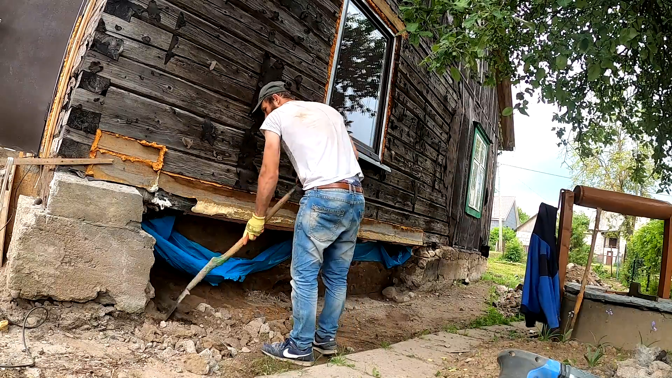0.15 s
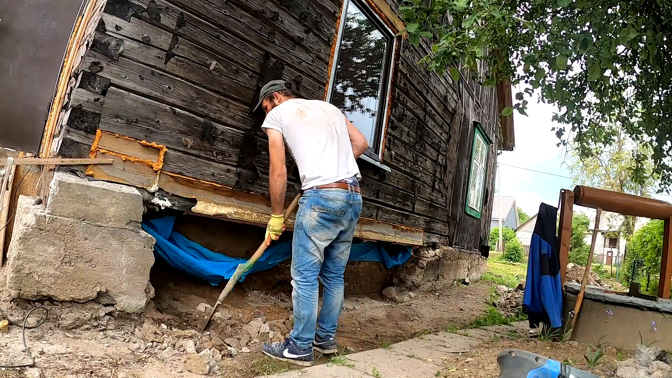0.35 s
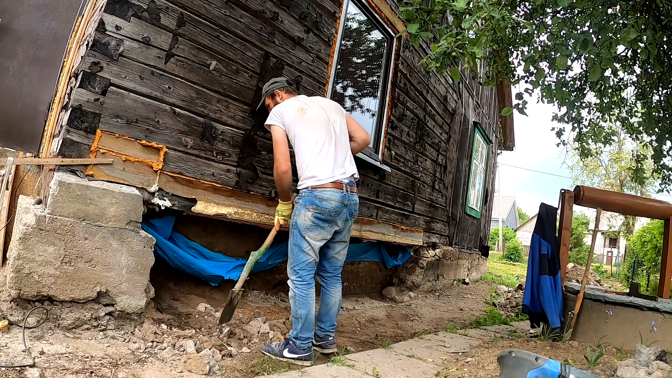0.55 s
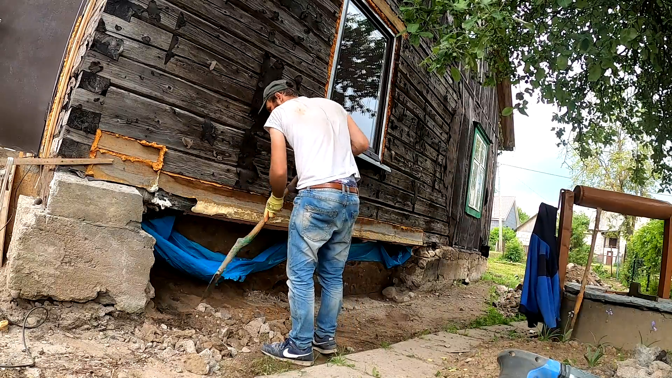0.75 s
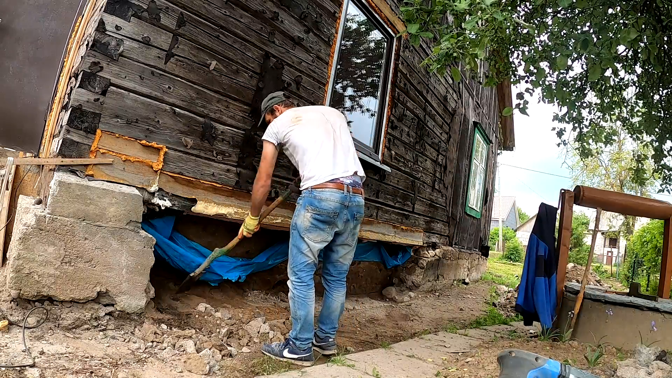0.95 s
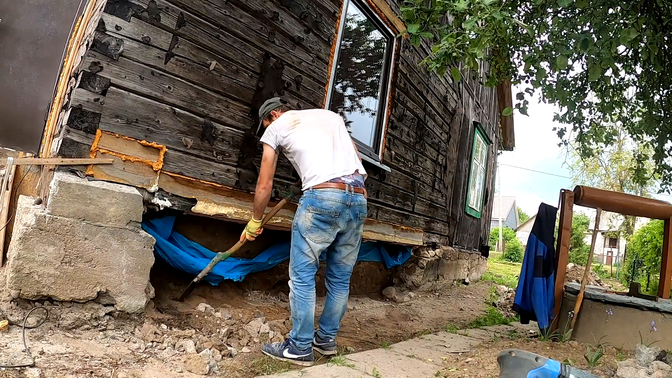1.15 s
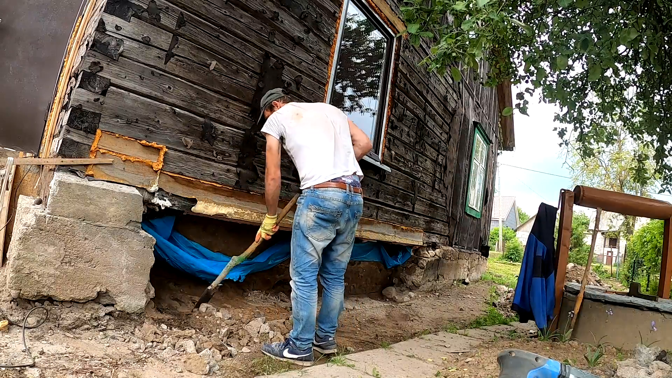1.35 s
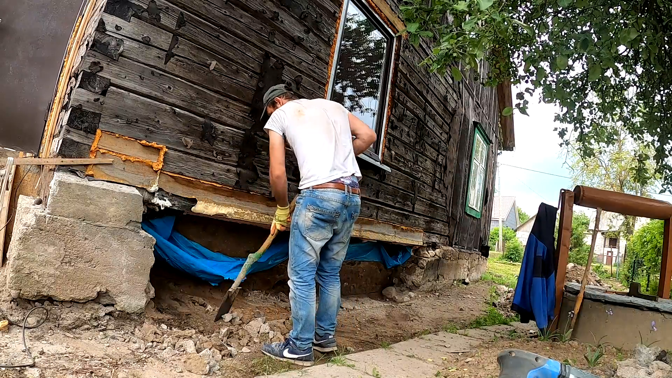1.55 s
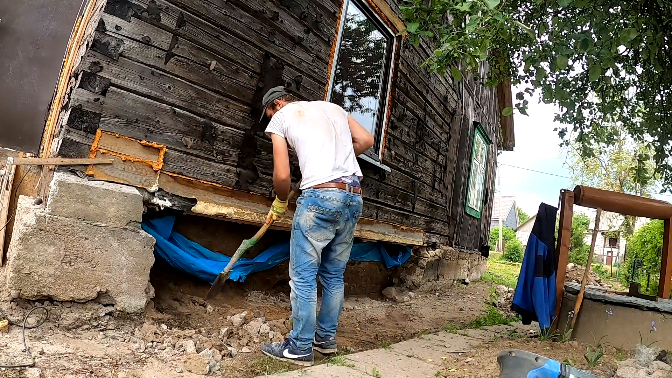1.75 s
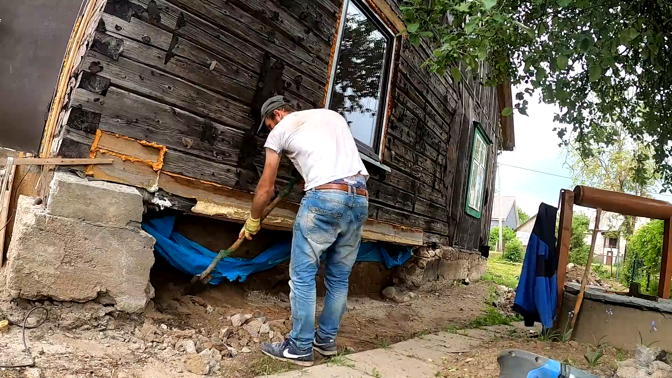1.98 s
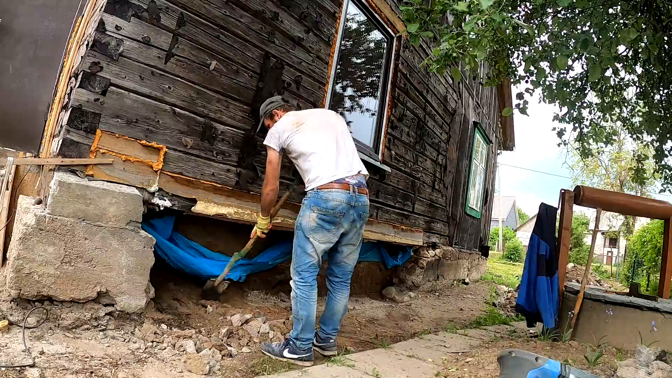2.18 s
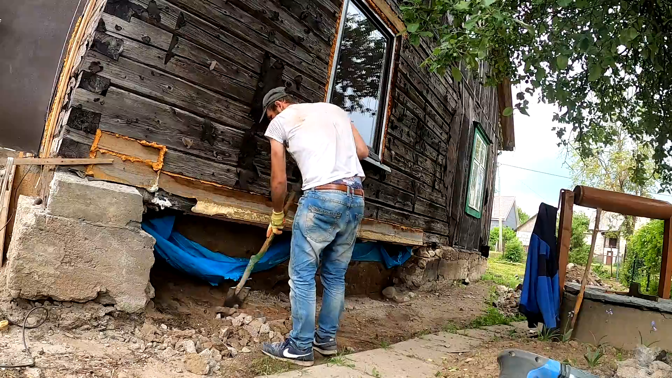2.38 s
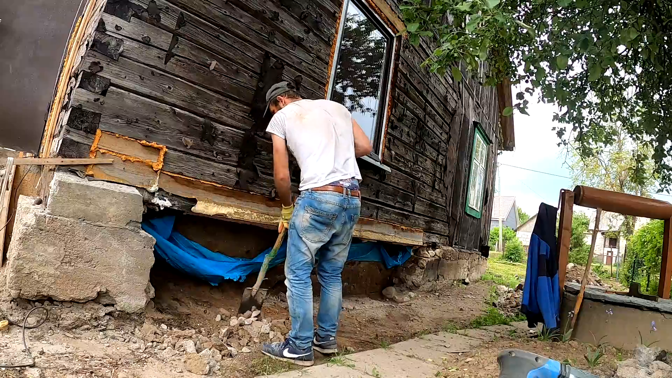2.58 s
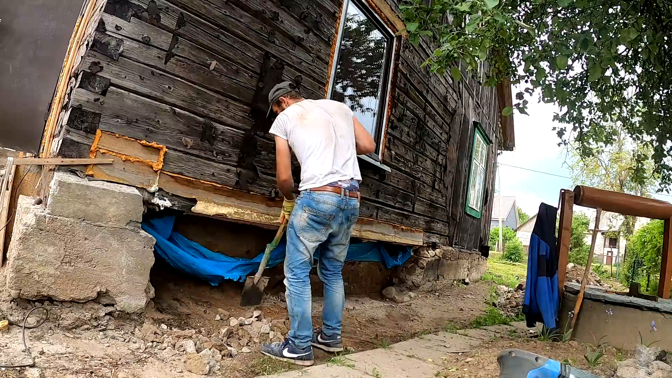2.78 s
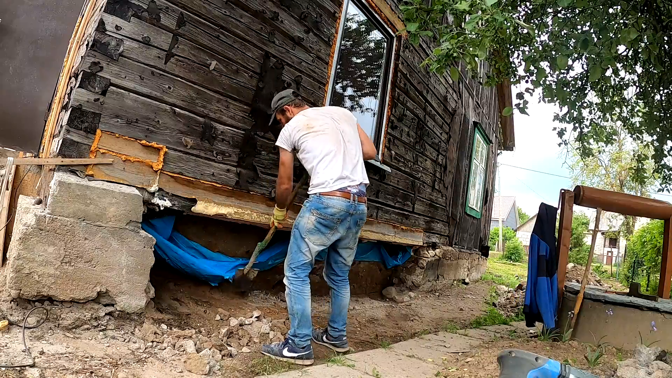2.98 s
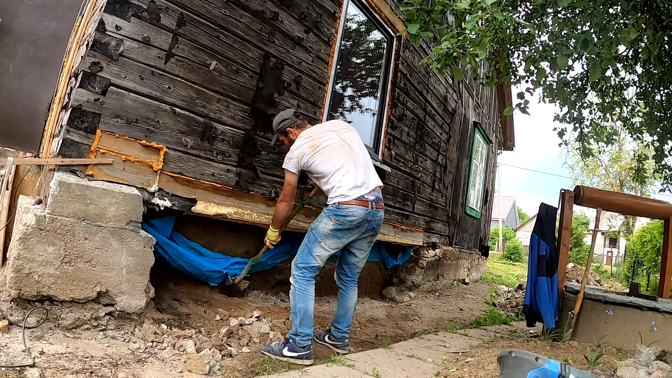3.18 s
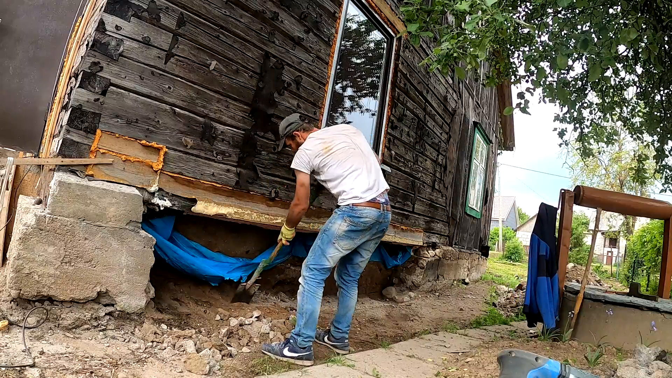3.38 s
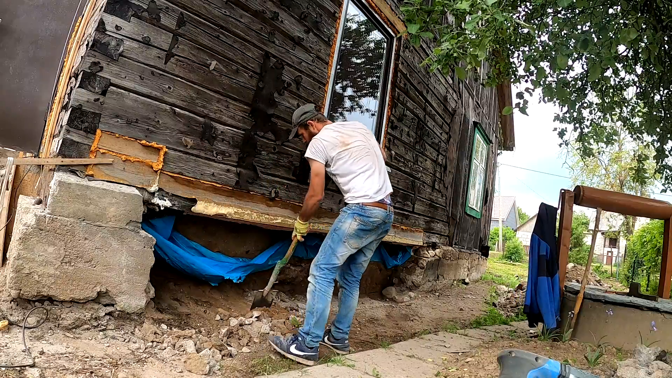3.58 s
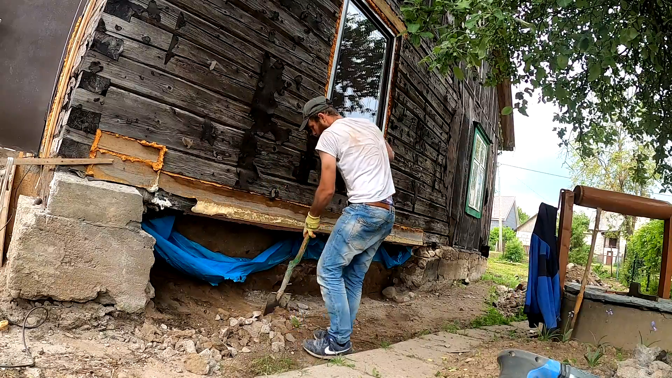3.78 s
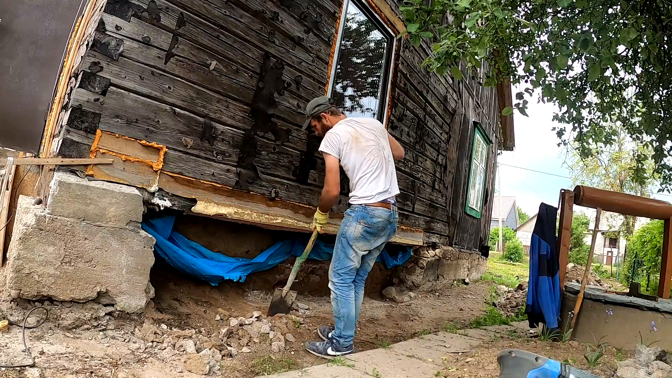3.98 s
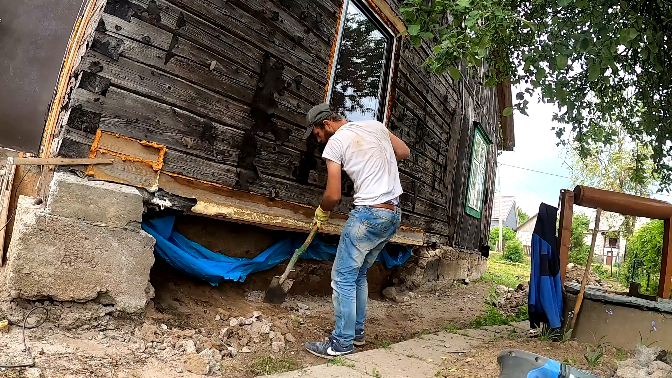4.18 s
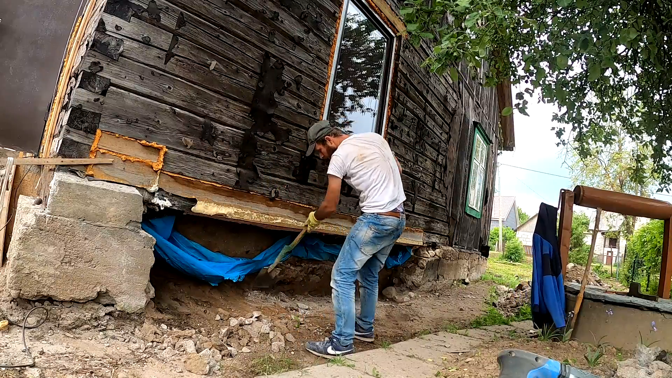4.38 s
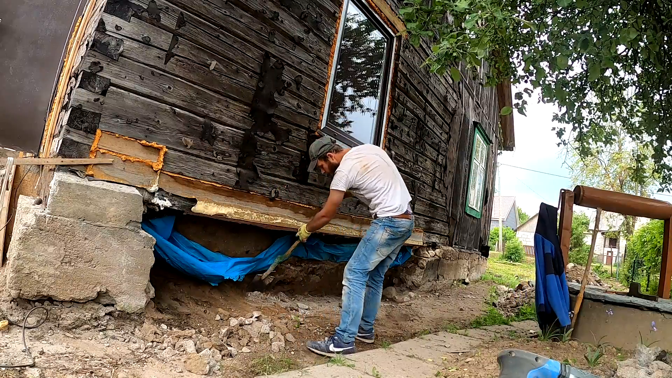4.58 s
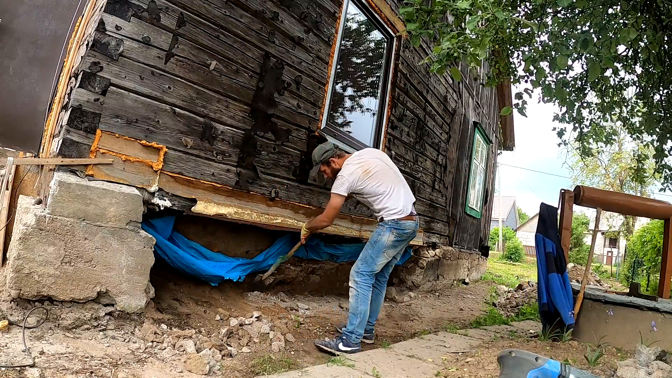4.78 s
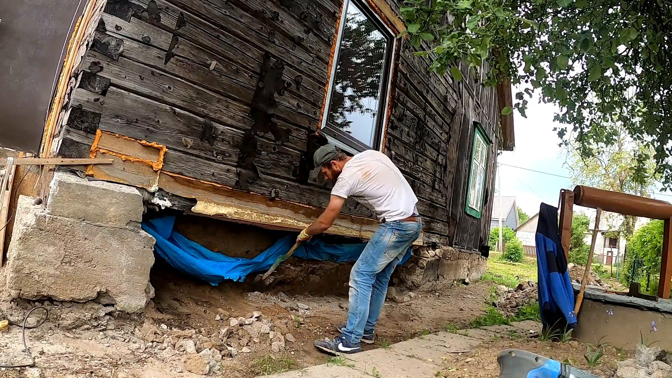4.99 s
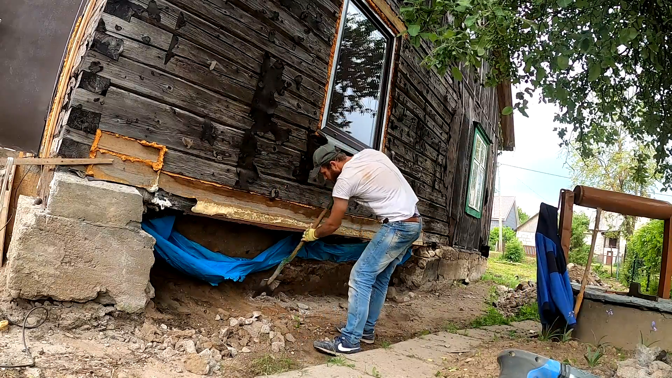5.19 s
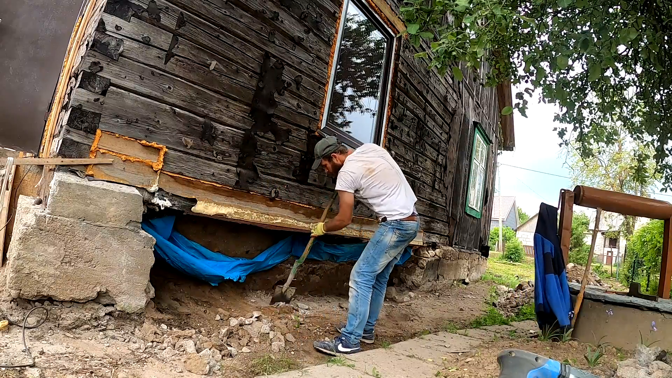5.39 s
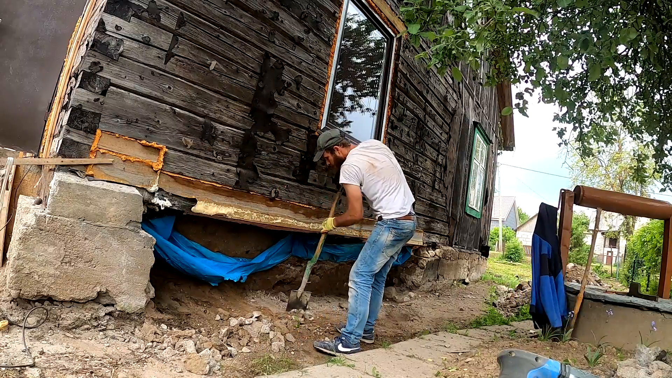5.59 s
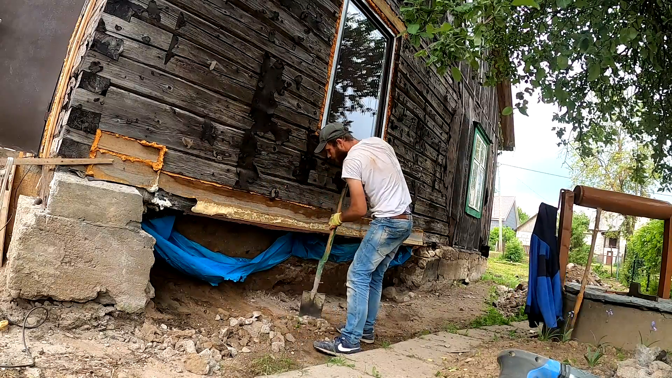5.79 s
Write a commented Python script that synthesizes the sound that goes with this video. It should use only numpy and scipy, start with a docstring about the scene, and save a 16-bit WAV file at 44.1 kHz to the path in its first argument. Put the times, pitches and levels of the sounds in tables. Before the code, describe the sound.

A steel shovel is pushed and dragged through stony soil and broken brick in about six strokes, roughly one a second. Each swells into a gritty crunch, with pebbles clicking on the blade and a dull thud from the ground. Gusts of wind rumble on the microphone, mostly in the first half. The shovel is fairly close, in a yard beside a house wall, over a faint outdoor hiss.

```python
"""A steel shovel is pushed and dragged through stony soil and broken brick beside a timber house.
Stones crunch and slide in bursts of grains that ring briefly themselves and shake the blade;
the soil thuds below, and the house wall returns a short blur.
Gusts buffet the two microphone ports, and a faint garden hiss lies under everything."""
import sys
import numpy as np
from scipy import signal
from scipy.fft import rfft, irfft, next_fast_len
from scipy.io import wavfile

SR = 44100
rng = np.random.default_rng(int(sys.argv[2]) if len(sys.argv) > 2 else 0)


def wav_out(sig):
    """Save sig, one row per channel (or a flat mono array), as 16-bit PCM at SR to the path in sys.argv[1]."""
    wavfile.write(sys.argv[1], SR, np.round(np.clip(np.atleast_2d(sig).T, -1, 1) * 32767).astype(np.int16))


N = 257984

# Resonances of blade and shaft. Each row: pitch in Hz, width in Hz, relative level in dB.
BLADE_MODES = [(275, 40, 3), (380, 50, -6), (710, 70, -8), (979, 48, -8), (1518, 70, -5), (1684, 50, -1),
               (2079, 50, -3), (2297, 50, -5), (2450, 60, -5), (2640, 60, -2), (3425, 70, -4),
               (4960, 120, -8), (6190, 90, 1), (7790, 90, -5)]
THUD_RISE_S = 0.0047


def amp(db):
    """Decibels to gain."""
    return 10 ** (np.asarray(db) / 20)


def rms_one(x):
    """Scale to rms 1."""
    return x / np.sqrt(np.mean(x ** 2) + 1e-20)


def in_time(rows):
    """Draw each column of a timed curve as an envelope, one value per sample."""
    times, *columns = np.transpose(rows)
    return [np.interp(np.arange(N) / SR, times, column) for column in columns]


def at_hz(points, hz):
    """Read a spectrum on a log-frequency axis."""
    pitches, values = np.transpose(points)
    return np.interp(np.log(hz), np.log(np.maximum(pitches, 1)), values)


def drift(rate_hz):
    """Slow random modulation of rms 1: coarse noise twice through a one-pole low-pass."""
    r = np.exp(-32 * np.pi * rate_hz / SR)
    slow = signal.lfilter([1], [1, -2 * r, r * r], rng.standard_normal(N // 16 + 2002))[2000:]
    return np.interp(np.arange(N) / 16, np.arange(len(slow)), rms_one(slow))


def resonate(x, hz, width_hz):
    """Two-pole resonance with gain 1 at its peak."""
    r = np.exp(-np.pi * width_hz / SR)
    feedback = [1, -2 * r * np.cos(2 * np.pi * hz / SR), r * r]
    return signal.lfilter([(1 - r * r) / 2, 0, (r * r - 1) / 2], feedback, x)


def band(x, low_hz, high_hz):
    """Butterworth band-pass."""
    return signal.sosfilt(signal.butter(2, [low_hz, high_hz], "band", fs=SR, output="sos"), x)


def spread(mid, side, likeness, colour):
    """Left and right share the mid signal and differ by the side signal, frequency by frequency."""
    size = next_fast_len(N)
    hz = np.maximum(np.arange(size // 2 + 1) * SR / size, 1)
    alike = np.clip(at_hz(likeness, hz), 0, 1)
    both = np.sqrt(1 + alike) * rfft(mid, size) + np.sqrt(1 - alike) * rfft(side, size) * [[1], [-1]]
    return irfft(both * amp(at_hz(colour, hz)) / np.sqrt(2), size)[:, :N]


def garden(level_db=-60.5):
    """Distant leaves and traffic: a smooth bed of hiss that swells slightly."""
    # Tone of the hiss. Each row: frequency in Hz, relative level in dB.
    colour = [(59, -36), (100, 16), (194, 0.5), (312, -11), (346, 10.5), (368, 3), (523, -17), (630, -36),
              (1010, 5.5), (3810, -9.5), (6250, -5.5), (9650, -42), (14000, -58)]
    # Its stereo image. Each row: frequency in Hz, left-right likeness from 0 to 1.
    likeness = [(60, 1), (180, 1), (550, 0.81), (1650, 0.67), (4970, 0.089), (15000, 0.24)]
    hiss = spread(*rng.standard_normal((2, N)), likeness, colour)
    return amp(level_db + 0.33 * drift(0.87)) * rms_one(hiss)


def wind(lumps_db=0.5, wander_db=5, flutter_db=-9.5, flutter_growth=.2):
    """Each port catches its own lumpy rumble, with a brighter flutter on top in strong gusts."""
    # The breeze between gusts. Each row: time in seconds, level in dB.
    breeze = [(0.0, -40), (0.55, -34), (0.67, -43), (1.37, -43.5), (1.71, -48), (1.87, -54), (2.07, -43),
              (3.11, -59), (3.4, -55.5), (4.02, -58.5), (4.77, -55.5), (5.1, -59), (5.3, -49), (5.85, -52)]
    # Buffets. Each row: start in seconds, level in dB, left over right in dB, rise in seconds.
    gusts = [(0.06, -43, -2, 0.026), (0.181, -36.5, 12, 0.018), (0.275, -28, 5, 0.038),
             (0.34, -29, -8, 0.056), (0.421, -29, -8, 0.049), (0.673, -34.5, 5, 0.032),
             (0.766, -42, 9, 0.024), (0.878, -27, 2, 0.029), (0.943, -38, 15, 0.037),
             (1.17, -38, 4.0, 0.04), (1.278, -35.5, 11, 0.019), (1.353, -25, -4, 0.029),
             (1.582, -47, -2.5, 0.035), (1.883, -33.5, 2, 0.033), (1.964, -33.5, -3, 0.036),
             (2.079, -39, 8.5, 0.034), (2.193, -32, 5, 0.024), (2.343, -32, 0.5, 0.018),
             (2.466, -31, -10, 0.023), (2.859, -43.5, -3.5, 0.11), (3.155, -48, 0, 0.04),
             (3.293, -44, 2.5, 0.024), (3.437, -43, 4, 0.055), (4.541, -41.5, 7, 0.03),
             (4.671, -42, 2, 0.063), (5.08, -39, 4, 0.032), (5.187, -45.5, 16, 0.033),
             (5.376, -39, 7.5, 0.053), (5.573, -44, 13, 0.024), (5.788, -35.5, 7, 0.04)]
    out, t = np.zeros((2, N)), np.arange(N) / SR
    level_db, = in_time(breeze)
    sway_db = wander_db * drift(4)
    for port, side in enumerate([.5, -.5]):
        rumble = rms_one(band(rng.standard_normal(N), 24.3, 60.8))
        flutter = rms_one(band(rng.standard_normal(N), 106, 182))
        lumps = amp(lumps_db * drift(16.5))
        strength = amp(level_db + side * sway_db) * rms_one(lumps)
        for s, gust_db, pan_db, rise in gusts:
            at = slice(max(int((s - .2) * SR), 0), int((s + .4) * SR))
            strength[at] += amp(gust_db + side * pan_db) * np.exp(-((t[at] - s) / rise - 1) ** 2)
        out[port] = strength * (rumble + amp(flutter_db) * strength ** flutter_growth * flutter)
    # one sharp puff hits the left port alone
    puff_s, puff_db, puff_hz, width_s = .9115, -13, 105, .008
    puff = np.exp(-((t - puff_s) / width_s) ** 2) * np.cos(2 * np.pi * puff_hz * (t - puff_s))
    out[0] += amp(puff_db) * puff
    return out


def yard(mid_side, t60=0.2, wet_db=-12, dull_hz=12000):
    """The wall and the hollow under the floor return a short blur; the camera body dulls the treble."""
    # The path from the pit, notched by the ground echo. Each row: frequency in Hz, gain in dB.
    path = [(100, 1.5), (270, 1.5), (480, -1.5), (740, -1), (860, -5.5), (970, -4.5), (1120, -4),
            (1200, -6), (1350, -6), (1550, -5.5), (6500, -2), (7000, -5), (7600, -2), (10000, -6.5),
            (13000, 0)]
    # Stereo image of the shovel. Each row: frequency in Hz, left-right likeness from 0 to 1.
    likeness = [(100, .995), (500, .985), (1000, .96), (2000, .93), (4000, .8), (8000, .74), (14000, .6)]
    t = np.arange(int(.15 * SR)) / SR
    blur = rng.standard_normal((2, len(t))) * amp(-60 * t / t60)
    echoes = signal.fftconvolve(mid_side, blur / np.linalg.norm(blur[0]), axes=1)[:, :N]
    lowpass = signal.butter(2, dull_hz, fs=SR, output="sos")
    dulled = signal.sosfilt(lowpass, mid_side + amp(wet_db) * echoes)
    return spread(*dulled, likeness, path)


def thumps():
    """The blade meets solid ground: a low tone roughened by the soil, dying fast."""
    # Each row: start in seconds, level in dB, pitch in Hz, 60 dB decay time in seconds.
    hits = [(0.319, -17, 268, 0.081), (0.44, -27.5, 163, 0.116), (0.499, -33, 196, 0.1),
            (1.157, -20, 281, 0.11), (1.337, -22.5, 260, 0.1), (1.451, -18.5, 258.4, 0.16),
            (1.489, -22.5, 277, 0.086), (2.27, -18.5, 315, 0.09), (2.359, -26.5, 349, 0.18),
            (2.454, -17, 147, 0.072), (3.561, -20, 286, 0.1), (4.67, -21.5, 124, 0.086),
            (5.36, -23.5, 317, 0.11), (5.572, -21, 314, 0.081)]
    out, t = np.zeros(N + SR), np.arange(SR // 4) / SR
    attack = np.minimum(t / THUD_RISE_S, 1)
    for s, level_db, hz, t60 in hits:
        soil = rms_one(band(rng.standard_normal(len(t)), 83, 330))
        body = np.sin(2 * np.pi * hz * t) + 0.66 * soil
        start = int(s * SR)
        out[start:start + len(t)] += amp(level_db - 60 * t / t60) * attack * body
    return out[:N]


def pebbles(cycles=5, boost_db=4):
    """Single pebbles tick once on the steel: a short ring with a bright snap."""
    # Each row: start in seconds, relative peak in dB, pitch in Hz.
    ticks = [(0.3374, -9, 1550), (0.5691, -19, 2600), (0.6978, -20, 2900), (1.0944, -28, 2290),
             (1.4544, -5, 1680), (1.4894, -8, 1690), (1.5294, -16, 1780), (2.4049, -7, 2760),
             (2.4244, -7, 2000), (2.5775, -18, 1540), (2.6424, -14, 2110), (3.3278, -8, 3320),
             (3.4321, -9, 2530), (3.4496, -7, 2080), (3.5498, -7, 2630), (3.6406, -8, 3450),
             (3.7708, -13, 1620), (4.8244, -21, 4870), (4.9018, -26, 2200), (5.0844, -37, 3600),
             (5.2639, -8, 2840), (5.3383, -10, 1760), (5.3632, -3, 1780), (5.5762, -7, 2450),
             (5.7214, -13, 2800)]
    out, click = np.zeros(N), signal.unit_impulse(SR // 50)
    for s, peak_db, hz in ticks:
        tick = resonate(click, hz, hz / cycles) + 0.08 * band(click, hz, 5900)
        start = int(s * SR)
        out[start:start + len(tick)] += amp(peak_db + boost_db) * tick / tick.max()
    return out


def swell(s, t60, fade_curve=1.215):
    """Span and envelope of a crunch: a rounded attack centred on s, then an ever faster fade."""
    rise_s = 0.0036 + 0.055 * t60   # longer crunches swell more slowly
    start = int((s - rise_s / 2) * SR)
    t = np.arange(min(SR // 6, N - start)) / SR
    attack = np.sin(np.pi / 2 * np.minimum(t / rise_s, 1)) ** 2
    fade = amp(-60 * (np.maximum(t - rise_s, 0) / t60) ** fade_curve)
    return slice(start, start + len(t)), attack * fade


def grains(per_s, spread_db):
    """Clumps of uneven clicks; mid and side take their own signs, as each grain lies elsewhere."""
    sizes = amp(spread_db * np.minimum(rng.exponential(1, N), 3))
    signs = rng.choice([-1, 1], (2, N))
    struck = rng.random(N) < per_s * amp(4.0 * drift(60)) / SR
    return rms_one(sizes * signs * struck + 1e-18)


def contact(crunches):
    """Envelopes of the contact in the thud, grit and treble ranges: the slide plus a swell per crunch."""
    # Pressure of the sliding blade, one curve per stroke.
    # Each row: time in seconds, grit level in dB, soil drag level in dB.
    strokes = [
        [(0.0, -55.5, -56), (0.174, -50, -55), (0.308, -27.5, -44.5), (0.428, -36.5, -54), (0.526, -41.5, -49),
         (0.65, -50, -60), (0.81, -53.5, -69), (1.0, -54.5, -69)],
        [(1.02, -58, -63), (1.13, -51, -63), (1.298, -39, -54), (1.386, -27.5, -45), (1.45, -20, -41),
         (1.602, -38, -50), (1.726, -48.5, -69), (1.95, -66.5, -68)],
        [(1.97, -76, -80.5), (2.14, -49, -54), (2.314, -25.5, -37.5), (2.372, -29.5, -41), (2.652, -44, -49.5),
         (2.724, -39.5, -59), (2.832, -52, -70), (3.05, -61, -74)],
        [(3.07, -63.5, -59.5), (3.208, -45.5, -56.5), (3.488, -30, -39), (3.718, -43, -53),
         (3.876, -50.5, -57.5), (4.004, -41.5, -55.5), (4.168, -55, -72), (4.45, -80.5, -72)],
        [(4.47, -65, -73.5), (4.7, -56, -60), (4.76, -48, -53), (4.836, -60, -61), (4.888, -49, -54),
         (5.002, -63, -64), (5.068, -52, -71), (5.17, -66.5, -72)],
        [(5.19, -69, -71), (5.278, -50, -60.5), (5.316, -28.5, -48), (5.398, -30, -42), (5.428, -44, -41),
         (5.468, -34.5, -47), (5.722, -39.5, -50), (5.85, -45, -53)],
    ]
    grit_db, drag_db = in_time(np.concatenate(strokes))
    brightness_db = 3.5 + 0.34 * grit_db   # harder pressure is brighter
    out = amp([drag_db, grit_db, grit_db + brightness_db])
    for s, peak_db, thud_db, treble_db, *_, t60 in crunches:
        at, envelope = swell(s, t60)
        rms_db = peak_db - 9.5
        out[:, at] += amp(rms_db + np.array([[thud_db], [0], [treble_db]])) * envelope
    return out


def stones(crunches, cycles=20, clack_db=(-9.5, -12.5), knock_db=-6, knock_t60=0.078):
    """The larger stones of each crunch clack at a low and a high pitch and knock the shaft."""
    out, rubbing = np.zeros((2, N)), grains(1200, spread_db=4.0)
    knock_pitches = BLADE_MODES[0][0] * rng.uniform(0.885, 1.24, len(crunches))
    for (s, peak_db, thud_db, _, *pitches, t60), knock_hz in zip(crunches, knock_pitches):
        at, envelope = swell(s, t60)
        for hz, level_db in zip(pitches, clack_db):
            makeup = np.sqrt(SR * cycles / hz / np.pi)
            clack = makeup * resonate(rubbing[:, at] * envelope, hz, hz / cycles)
            out[:, at] += amp(peak_db + level_db) * resonate(clack, hz, hz / 3)
        t = np.arange(len(envelope)) / SR
        knock_shape = np.minimum(t / THUD_RISE_S, 1) * amp(-60 * t / knock_t60)
        out[:, at] += amp(peak_db + thud_db + knock_db) * knock_shape * np.sin(2 * np.pi * knock_hz * t)
    return out


def blade(strengths, gain_db=-10.5):
    """Grains drive the modes of the held blade, which favours other ones from moment to moment."""
    # The freed blade rings on.
    # Each row: start in seconds, pitch in Hz, level in dB, 60 dB decay time in seconds.
    rings = [(1.76, 1418, -54, .6), (4.99, 3600, -46, .2)]
    out, rubbing = np.zeros((2, N)), grains(5000, spread_db=2.0)
    for hz, width_hz, level_db in BLADE_MODES:
        strength = strengths[np.searchsorted([800, 5500], hz)]   # thud, grit or treble range
        push = rubbing * strength * amp(4.5 * drift(12))
        makeup = np.sqrt(SR / width_hz / np.pi)
        out += amp(level_db + gain_db) * makeup * resonate(push, hz, width_hz)
    for s, hz, level_db, t60 in rings:
        t = np.arange(N - int(s * SR)) / SR
        envelope = np.minimum(200 * t, 1) * amp(level_db - 60 * t / t60)
        out[:, int(s * SR):] += envelope * np.sin(2 * np.pi * hz * t)
    return out


def grit(strengths, cycles=3.76, bands=24, gain_db=-9.0, flicker_db=4.67):
    """Each grain rings for a few cycles at the three pitches of its own stone."""
    # Tone of the grit. Each row: frequency in Hz, relative level in dB.
    colour = [(65, -36), (110, -2.5), (222, -7), (268, -2), (469, -7.5), (739, -8), (854, -14), (967, -2.5),
              (1070, -13), (1730, -5), (2670, -5), (2960, -6), (7670, -5), (12100, -39), (15500, -70)]
    kinds = bands // 3
    clicks, kind = grains(7000, spread_db=4.5), rng.integers(0, kinds, N)
    centres = np.log([300, 2500, 8000])   # of the thud, grit and treble ranges
    out = 0
    for k, hz in enumerate(np.geomspace(120, 14500, bands)):
        shares = [np.interp(np.log(hz), centres, row) for row in np.eye(3)]
        strength = np.exp(np.dot(shares, np.log(strengths)))   # crossfade between the ranges
        colour_db = at_hz(colour, hz) - at_hz(colour, np.exp(np.dot(shares, centres)))
        ring = resonate(clicks * (kind == k % kinds), hz, hz / cycles)
        stone = rms_one(resonate(ring, hz, hz))
        level_db = gain_db + colour_db + flicker_db * np.minimum(drift(36), 1.5)
        out += amp(level_db) * strength * stone
    return out


def shovel():
    """Mid and side signal of everything the shovel stirs as it scrapes through the ground."""
    # Stones crushed or struck. Each row: time in seconds, relative peak in dB, thud and treble
    # offsets in dB, low and high stone pitch in Hz, 60 dB decay time in seconds.
    crunches = [(0.132, -17.5, -6.5, 5.5, 2130, 6300, 0.079), (0.141, -13.5, -14, -0.5, 2760, 5090, 0.078),
                (0.22, -12.5, -35, -6, 2150, 5850, 0.065), (0.237, -12, -21, -11, 2750, 5540, 0.047),
                (0.322, -10.5, -10, -6, 2830, 4500, 0.054), (0.333, -8.5, -17, -5.5, 1550, 6350, 0.06),
                (0.361, -17, -17, 2, 2640, 5130, 0.067), (0.378, -19.5, -25, -10, 2720, 6000, 0.052),
                (0.452, -19, -23, -8, 2470, 3370, 0.039), (0.477, -36, -3, -21, 1660, 3480, 0.041),
                (0.522, -31.5, -20, -13, 1670, 3070, 0.12), (0.567, -22.5, -35, -6, 2500, 5870, 0.063),
                (0.603, -24, -23, -13, 2550, 3530, 0.055), (0.624, -20.5, -44, -7, 2430, 5970, 0.073),
                (1.057, -30.5, -10, -22, 1340, 3510, 0.099), (1.093, -35, -10, -8, 2290, 3370, 0.077),
                (1.157, -12, -16, -2, 2320, 3420, 0.038), (1.22, -34, -15, -9, 1430, 4900, 0.072),
                (1.233, -21, -13.5, -10, 1735, 3540, 0.089), (1.261, -23, -26, -2.5, 2360, 3530, 0.051),
                (1.275, -24.5, -18, 1, 1710, 3520, 0.038), (1.325, -11.5, -18, -5.5, 1630, 3500, 0.063),
                (1.34, -12.5, -32, -8, 1760, 3870, 0.04), (1.361, -11.5, -13.5, -7, 2270, 4560, 0.073),
                (1.384, -17.5, -23, -18, 2200, 3580, 0.051), (1.421, -12.5, -34, -3, 1750, 4760, 0.11),
                (1.447, -17.5, -18, -8, 1700, 3340, 0.12), (1.487, -9.5, -14.5, -10, 1710, 5000, 0.049),
                (1.531, -23.5, -4, -34, 1820, 5450, 0.082), (1.645, -28, -42, -5, 2360, 6200, 0.11),
                (1.672, -19, -35, -8, 2890, 5400, 0.087), (1.733, -31.5, -21.5, -25, 1465, 4230, 0.071),
                (1.827, -45, -18, -10, 1370, 3610, 0.045), (2.048, -41.5, -17.5, -8, 1410, 3580, 0.077),
                (2.073, -40.5, -13, -4, 1610, 5040, 0.14), (2.112, -32, -16, -6, 1960, 3930, 0.065),
                (2.153, -8, -8, -2, 2390, 3450, 0.039), (2.224, -17, -32, 6, 2940, 3500, 0.075),
                (2.233, -10.5, -21, -3, 2750, 5160, 0.077), (2.276, -10, -26, -2, 1560, 3430, 0.082),
                (2.318, -17.5, -23.5, -14, 2520, 5150, 0.057), (2.403, -14, -15, -3, 2730, 2950, 0.063),
                (2.414, -11.5, -18, -8, 1805, 3800, 0.065), (2.427, -8.5, -19, -2, 2000, 5630, 0.092),
                (2.458, -9, -23, -2, 2780, 3930, 0.051), (2.479, -15, -36, -8, 2030, 3500, 0.055),
                (2.543, -21, -35, -19, 1740, 3500, 0.03), (2.576, -21, -11, -37, 1510, 3900, 0.039),
                (2.64, -19.5, -21, -29, 2150, 3740, 0.075), (2.679, -27.5, -9, -6, 1880, 4500, 0.082),
                (2.708, -31.5, -16, -17, 2600, 3430, 0.029), (2.78, -31, -4.5, -7, 2520, 4870, 0.079),
                (2.816, -29, -23, -5, 2130, 3100, 0.092), (3.157, -36.5, -34.5, -7, 1700, 2980, 0.072),
                (3.222, -34.5, -19, -7, 1810, 3540, 0.079), (3.289, -7, -13.5, -7.5, 1440, 2930, 0.052),
                (3.302, -7.5, -16, -14.5, 2540, 3040, 0.068), (3.326, -10.5, -11.5, -8, 1970, 3320, 0.041),
                (3.391, -12, -21, -9, 2000, 3290, 0.044), (3.401, -10, -25, -6.5, 1560, 3140, 0.035),
                (3.432, -16.5, -20, -17, 2440, 4000, 0.06), (3.448, -6.5, -14, -6, 2130, 3760, 0.039),
                (3.467, -9.5, -13, -7, 1780, 5030, 0.058), (3.497, -15.5, -18, -16, 1660, 4200, 0.11),
                (3.513, -9, -22, -14, 2090, 5940, 0.092), (3.548, -9.5, -28, -15, 2620, 4880, 0.076),
                (3.559, -11.5, -20, -17, 2360, 3380, 0.082), (3.583, -10, -24, -14, 2570, 3500, 0.054),
                (3.612, -10, -11, 2, 2380, 3340, 0.055), (3.639, -11.5, -11.5, -5, 1790, 3450, 0.057),
                (3.679, -18, -14.5, 0, 1720, 3470, 0.045), (3.707, -35, -19, -8, 1740, 4400, 0.087),
                (3.753, -26, -38, -1, 2430, 3160, 0.046), (3.77, -15, -18.5, -7, 1620, 3070, 0.057),
                (3.814, -28.5, -14, -3, 1730, 3250, 0.094), (3.842, -21, -11.5, -14, 1810, 3900, 0.065),
                (3.855, -14, -12, -15, 1790, 4040, 0.089), (3.908, -33, -21, -1, 2250, 3850, 0.045),
                (3.975, -38.5, -10.5, -4, 2710, 3100, 0.065), (4.039, -35.5, -13, -5, 2460, 3040, 0.065),
                (4.063, -34, -25, -8, 2470, 3940, 0.041), (4.103, -40, -33.5, -3, 1520, 3950, 0.081),
                (4.51, -46, -6, -20, 1590, 3800, 0.063), (4.668, -8.5, -17.5, -2.5, 2600, 3160, 0.065),
                (4.692, -14.5, -20, -7, 2680, 3400, 0.084), (4.715, -19, -21, -4, 2090, 3600, 0.063),
                (4.734, -27.5, -22, -15, 2360, 4220, 0.082), (4.804, -28.5, -30, -17, 2280, 5060, 0.06),
                (4.822, -26, -38, -9, 2560, 4870, 0.06), (4.857, -32.5, -9, -4, 2360, 4880, 0.068),
                (4.9, -33.5, -12, 5.5, 2200, 5840, 0.037), (4.968, -38.5, -23, -1, 2850, 3170, 0.065),
                (4.988, -29.5, -21, -14, 2880, 3540, 0.06), (5, -29, -16.5, -8, 2230, 3440, 0.1),
                (5.021, -28, -35, -1, 2890, 6100, 0.073), (5.066, -34.5, -22, -2, 2120, 3500, 0.065),
                (5.218, -27, -23, -15, 2240, 3430, 0.058), (5.243, -15, -42, -2, 2060, 3500, 0.095),
                (5.264, -8.5, -16, -4, 2840, 3440, 0.061), (5.277, -17.5, -25, -8, 1890, 3400, 0.048),
                (5.326, -17, -9.5, -6, 1720, 3810, 0.059), (5.34, -11, -16, -8, 1790, 3400, 0.076),
                (5.362, -9.5, -17, -13, 1850, 3400, 0.049), (5.383, -15, -12, -11, 2640, 3440, 0.055),
                (5.409, -18, -20, -13, 2820, 3390, 0.056), (5.434, -15.5, -19, -10, 2700, 3120, 0.093),
                (5.447, -12, -18, -13, 2210, 3210, 0.059), (5.475, -13, -18, -2.5, 2510, 3640, 0.039),
                (5.535, -10, -8.5, -1, 2500, 3800, 0.047), (5.577, -4, -13.5, -4.5, 2454, 3860, 0.041),
                (5.583, -17.5, -24, -8, 2540, 3840, 0.028), (5.637, -23, -34, -4, 2600, 3880, 0.065),
                (5.658, -18, -19, -15, 1590, 3800, 0.075), (5.719, -14.5, -31, -22, 2660, 3450, 0.024),
                (5.742, -23, -13, -6, 2420, 3700, 0.06), (5.767, -17.5, -23, -3, 2530, 4100, 0.061),
                (5.787, -18, -19, -19, 2520, 3900, 0.049), (5.83, -20, -15, -17, 2610, 3940, 0.046)]
    strengths = contact(crunches)
    return grit(strengths) + blade(strengths) + stones(crunches) + pebbles() + thumps()


def scene():
    """The shovel in the yard, over wind and garden hiss."""
    return yard(shovel()) + wind() + garden()


def record(dry, left_lag_s=1.8e-5, ceiling=.8, cutoff_hz=15900):
    """The camera body shades the ports unequally and the left lags; peaks are rounded, the top is cut."""
    # Shadow of the camera body. Each row: frequency in Hz, left over right in dB.
    shadow = [(60, -1.4), (300, -.2), (700, -.2), (1400, .8), (2800, 1.5), (4500, 1.5), (7000, -2),
              (10000, -8), (15000, -11)]
    size = next_fast_len(N)
    hz = np.arange(size // 2 + 1) * SR / size
    balance = amp(at_hz(shadow, np.maximum(hz, 1)) * [[.5], [-.5]])
    lag = np.exp(-2j * np.pi * hz * [[left_lag_s], [0]])
    heard = irfft(rfft(dry, size) * balance * lag, size)[:, :N]
    rounded = ceiling * np.tanh(heard / ceiling)
    return signal.sosfilt(signal.cheby2(16, 70, cutoff_hz, fs=SR, output="sos"), rounded)


dry = scene()
out = record(dry)
wav_out(out)
```